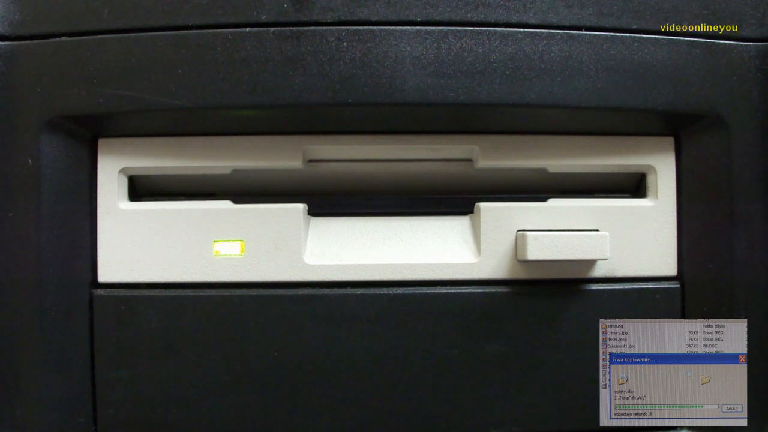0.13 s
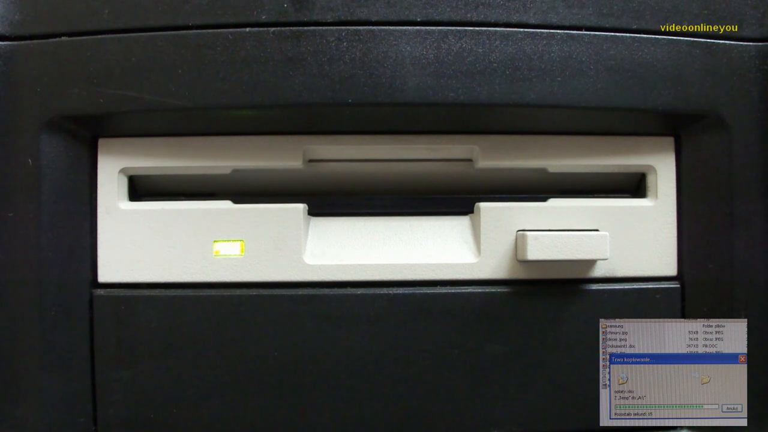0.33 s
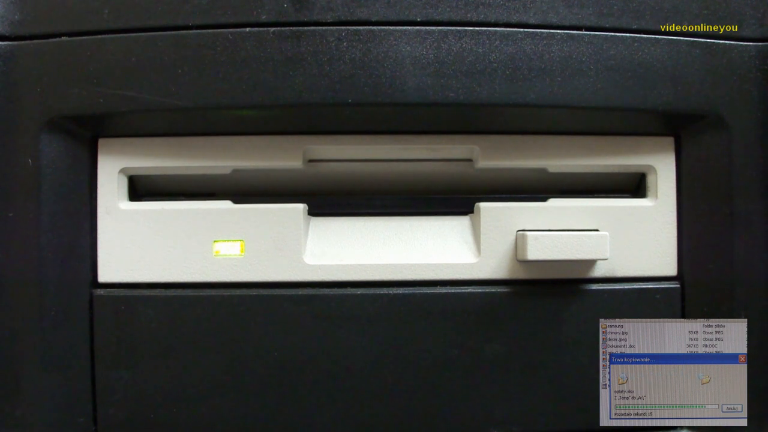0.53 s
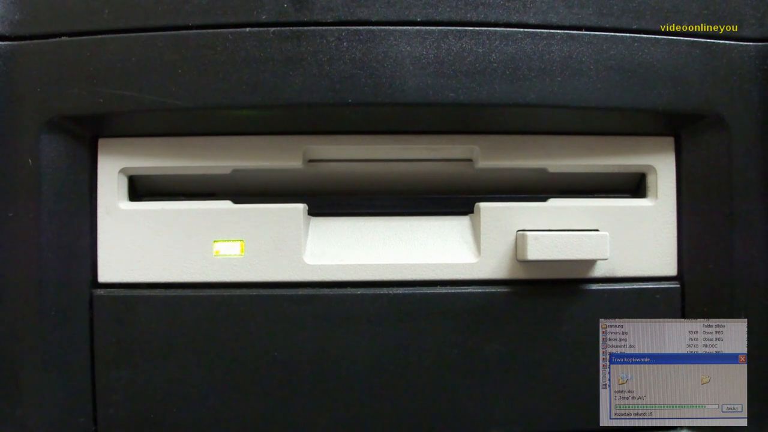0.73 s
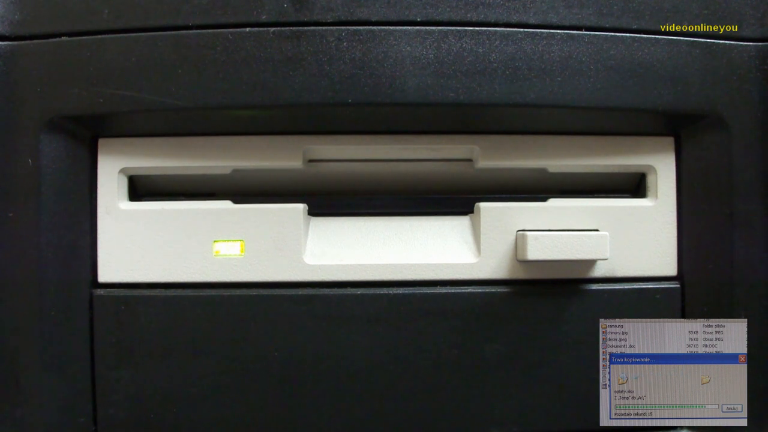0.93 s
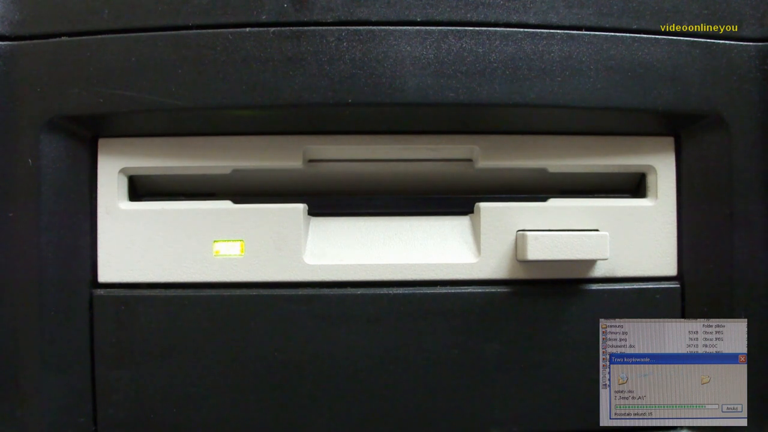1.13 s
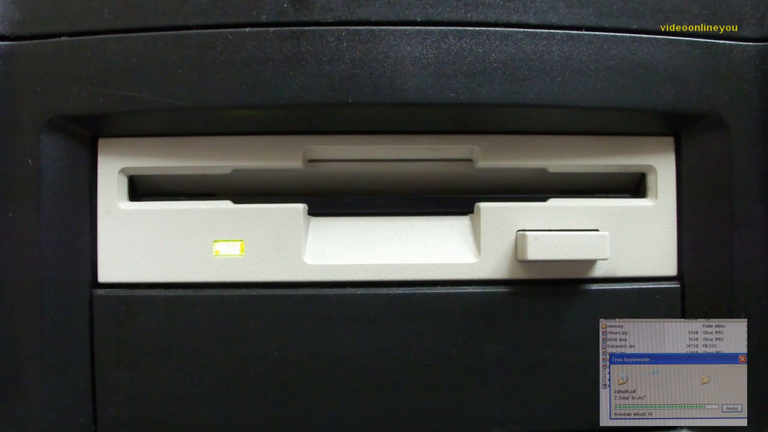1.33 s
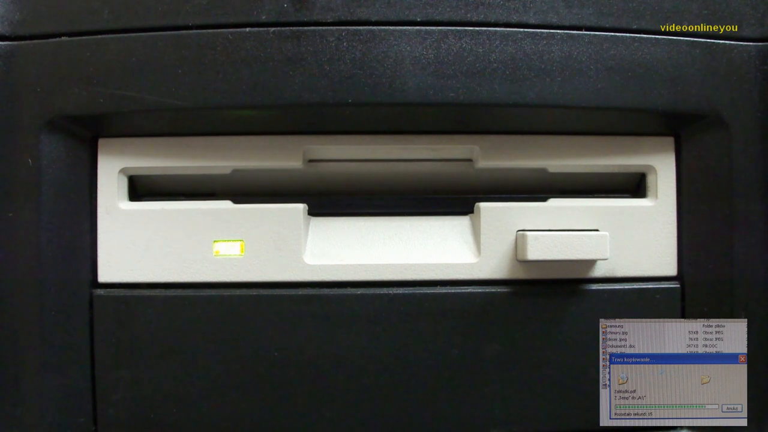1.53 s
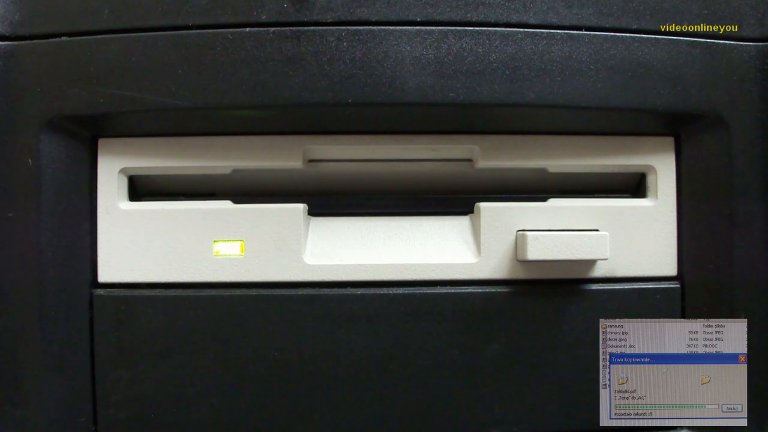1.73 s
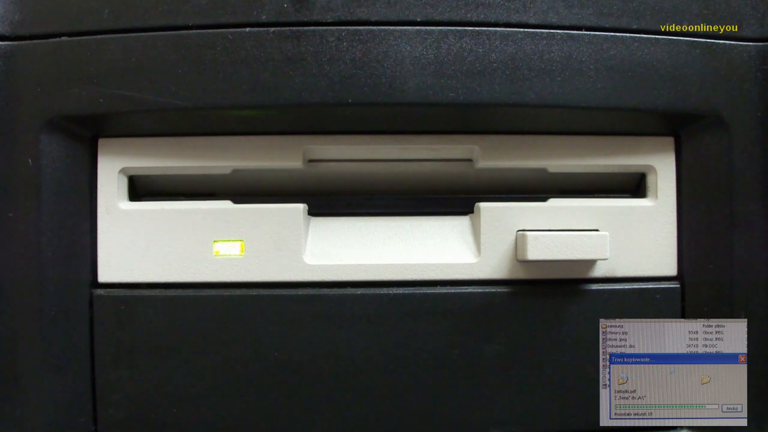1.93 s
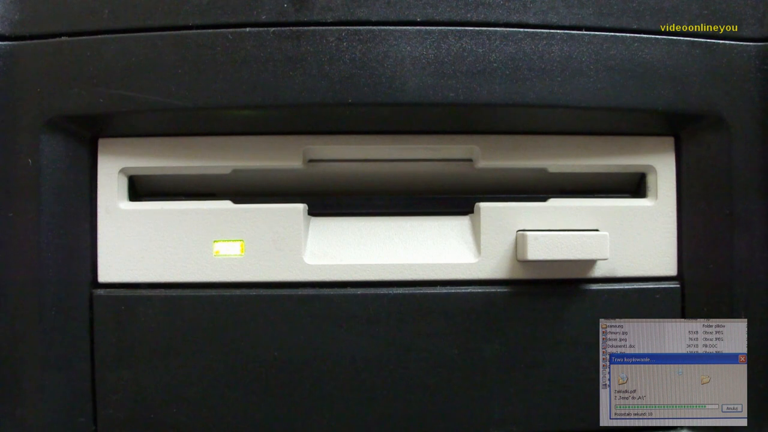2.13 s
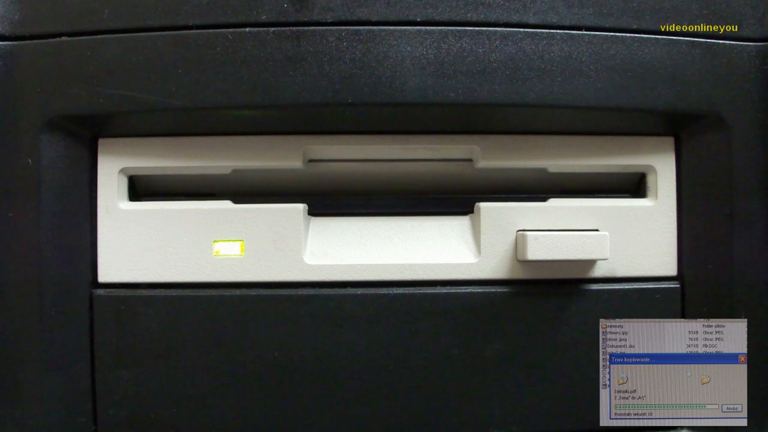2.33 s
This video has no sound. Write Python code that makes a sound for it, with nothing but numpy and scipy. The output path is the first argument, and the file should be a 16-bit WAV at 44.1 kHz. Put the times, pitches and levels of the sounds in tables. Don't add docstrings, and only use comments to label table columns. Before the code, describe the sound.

A floppy drive gives two short, steady-pitched mechanical buzzes, each starting and ending with a knock and rattle, while a computer case fan whirs constantly; close small camera microphone, drive sounding to the right.

```python
import sys
import numpy as np
from scipy import signal
from scipy.fft import rfft, irfft, next_fast_len
from scipy.io import wavfile
from scipy.ndimage import uniform_filter1d

SR = 44100
rng = np.random.default_rng(int(sys.argv[2]) if len(sys.argv) > 2 else 0)


def attenuation_scalar(level_db):
    decades = np.asarray(level_db, float) / 20
    return 10 ** decades


def master_out(mix):
    frames = np.transpose(np.atleast_2d(mix))
    ceiling = np.clip(frames, -1, 1)
    pcm = np.round(ceiling * 32767).astype(np.int16)
    wavfile.write(sys.argv[1], SR, pcm)


N = 105840


def evened(x):
    return x / np.sqrt(np.mean(x ** 2) + 1e-20)


def read(points, hz):
    f, value = np.transpose(points)
    return np.interp(np.log(hz + 1), np.log(f + 1), value)


def resonate(x, hz, width):
    r = np.exp(-np.pi * width / SR)
    return 2 * signal.lfilter([1 - r], [1, -r * np.exp(2j * np.pi * hz / SR)], x).real


def bandpass(x, order, low_hz, high_hz):
    return signal.sosfilt(signal.butter(order, [low_hz, high_hz], "bandpass", fs=SR, output="sos"), x)


def slow(seconds, count):
    size = max(int(seconds * SR), 1)
    drift = uniform_filter1d(uniform_filter1d(rng.standard_normal((count, N)), size), size)
    return drift / drift.std(axis=1, keepdims=True)


def shape(start, stop, rise, t60):
    t = np.arange(N) / SR
    return np.clip((t - start) / rise, 0, 1) * attenuation_scalar(-60 * np.maximum(t - stop, 0) / t60)


def panned(x, pan_db):
    return x * attenuation_scalar(np.array([[pan_db / 2], [-pan_db / 2]]))


def air(level_db, same, lead, patchy_db):
    a, b, c, d, patches = rng.standard_normal((N // 256 + 5, 513, 5)).T
    patches = evened(uniform_filter1d(uniform_filter1d(patches, 8, 0), 8, 1))
    same = np.clip(same, -1, 1)
    right = a + 1j * b
    left = same * np.exp(1j * lead) * right + np.sqrt(1 - same ** 2) * (c + 1j * d)
    spectra = np.array([left, right]) * attenuation_scalar(level_db[:, None] + patchy_db * patches)
    return evened(signal.istft(spectra, nperseg=1024, noverlap=768)[1][:, :N])


def air_rush(hz):
    # (frequency [Hz], level per Hz [dB])
    blades = [(18, -85), (30, -61), (109, -28.5), (154, -11), (286, -4.5), (445, -9), (606, -7.5),
              (1680, -5), (3000, -20.5), (3900, -72.5), (6600, -120)]
    # (frequency [Hz], width [Hz], gain [dB])
    case = [(604, 180, 8), (799, 120, 5), (1110, 120, 2), (1310, 83, 3.5), (1756, 35, 5.5), (389, 90, 3),
            (528.6, 32, 4.5)]
    # (frequency [Hz], likeness [0-1])
    likeness = [(60, 0.03), (100, 0.88), (180, 0.22), (300, 0.062), (520, 0.39), (890, 0.43), (1520, 0.64),
                (2600, 0.37)]
    # (frequency [Hz], phase [rad])
    left_lead = [(0, 0.11), (1120, 0.1), (1640, 0.85), (2150, 0), (2760, 1)]
    case_db = sum(db / (1 + (2 * (hz - f) / w) ** 2) for f, w, db in case)
    same, lead = read(likeness, hz)[:, None], read(left_lead, hz)[:, None]
    return attenuation_scalar(-48) * air(read(blades, hz) + case_db, same, lead, patchy_db=0.5)


def air_hiss(hz):
    # (frequency [Hz], level per Hz [dB])
    grille = [(2700, -36), (3200, -9.5), (4800, -11), (5500, -2), (7500, 0), (10100, -5), (11200, -12),
              (12100, -40)]
    # (frequency [Hz], level per Hz [dB])
    faint_top = [(13700, -43), (14100, -15), (15100, -22.5), (15650, 3), (15900, -17)]
    whistle_db = 10 * np.exp(-((hz - 10520) / 230) ** 2)
    edge_db = -60 * (hz > 11750)
    hiss = air(read(grille, hz) + edge_db + whistle_db, 0.13, 0, patchy_db=1.5)
    top = air(read(faint_top, hz), 0.1, 0, patchy_db=3)
    return attenuation_scalar(-65.5) * hiss + attenuation_scalar(-88) * top


def whines():
    # (frequency [Hz], rms level [dB], waver [Hz])
    tones = [(119.9, -71.5, .05), (612.5, -63, 4.82), (1168, -66.5, 3.5), (7800, -88, 3), (5520, -116, 3),
             (4791, -84.5, 3), (3380, -100, 2.2)]
    drift = slow(0.056, count=len(tones))
    out = np.zeros(N)
    for (hz, db, waver_hz), pitch, swell in zip(tones, drift, drift[::-1]):
        phase = 2 * np.pi * np.cumsum(hz + waver_hz * pitch) / SR
        out += np.sqrt(2) * attenuation_scalar(db + min(waver_hz, 4) * swell) * np.sin(phase)
    return out


def fan():
    hz = np.fft.rfftfreq(1024, 1 / SR)
    return panned(air_rush(hz) + whines(), -5.5) + panned(air_hiss(hz), -3.5)


def room(x):
    t = np.arange(SR // 2) / SR
    taps = rng.choice([-1., 1.], (2, len(t))) * (rng.random((2, len(t))) < .05)
    tail = taps * attenuation_scalar(-60 * t / 0.38) * (t > .003)
    return signal.fftconvolve(x[None], tail / np.linalg.norm(tail[0]), axes=1)[:, :N]


def chassis(x):
    # (frequency [Hz], width [Hz], level [dB])
    modes = [(569.5, 130, -6), (798.4, 93, 1.5), (946, 150, -9), (1098, 84, 1), (1470, 58, -6),
             (1700, 39, 1), (1830, 50, -4), (2080, 91, -3), (2285, 410, -12.5)]
    rung = sum((-1) ** k * attenuation_scalar(db) * resonate(x, f, w) for k, (f, w, db) in enumerate(modes))
    skin = attenuation_scalar(-18.5) * resonate(x, 1500, 1330)
    return bandpass(rung + skin, 5, 250, 2700)


def bright(x):
    tick = resonate(resonate(x, 6700, 6200), 6700, 6200)
    rail = attenuation_scalar(9.5) * resonate(x, 6380, 420)
    return evened(bandpass(tick + rail, 10, 3000, 10200))


def squeal():
    middle_s, length_s, hz, width_hz = 0.527, 0.097, 1865, 34
    t = np.arange(N) / SR
    sing = evened(resonate(resonate(rng.standard_normal(N), hz, width_hz), hz, width_hz))
    return attenuation_scalar(-47) * np.exp(-((t - middle_s) / length_s) ** 2) * sing


def knocks():
    # (time [s], peak level [dB], upper mode [Hz], upper mode level [dB])
    blows = [
        (.236, -35.5, 1700, -13),
        (.643, -37.5, 1480, -3),
        (.903, -42, 1470, 2),
        (1.315, -40, 1676, -6),
    ]
    # (frequency [Hz], level [dB], ring-out T60 [s])
    low_modes = [(818.5, -2.5, 0.084), (945, -7.5, 0.04)]
    t = np.arange(N) / SR
    out = np.zeros(N)
    for s, peak_db, upper_hz, upper_db in blows:
        for hz, db, t60 in list(low_modes) + [(upper_hz, upper_db, 0.029)]:
            ring = shape(s, s + 0.012, 0.005, t60)
            out += attenuation_scalar(peak_db + db) * ring * np.sin(2 * np.pi * hz * (t - s))
    return out


def clatter():
    # (start [s], length [s])
    times = [
        (.223, .02),
        (.637, .016),
        (.895, .014),
        (1.31, .02),
        (1.02, .01),
        (1.08, .012),
        (1.158, .012),
        (1.338, .012),
    ]
    # (frame level [dB], tick level [dB])
    levels = [(-42, -61), (-42.5, -61.5), (-41, -62.5), (-44, -59.5), (-58, -63.5), (-48, -63), (-60, -64),
              (-46, -68)]
    rattle_per_s, spread_db, t60 = 2500, 2, 0.07
    size = attenuation_scalar(spread_db * np.minimum(rng.exponential(1, N), 3))
    hits = (rng.random(N) < rattle_per_s / SR) * size * rng.choice([-1., 1.], N)
    body, tick = np.zeros(N), np.zeros(N)
    for (s, length), (frame_db, tick_db) in zip(times, levels):
        body += attenuation_scalar(frame_db) * shape(s, s + length, 0.0014, t60)
        tick += attenuation_scalar(tick_db) * shape(s, s + length / 2, 0.0062, t60)
    return chassis(hits * body) / np.std(chassis(hits)) + tick * bright(rng.standard_normal(N))


def stepper():
    # (start [s], stop [s])
    times = [
        (.236, .644),
        (.899, 1.313),
    ]
    # (level [dB], rise [s], ring-out T60 [s])
    seeks = [(-35.5, 0.029, 0.16), (-40.5, 0.012, 0.12)]
    # (multiple of step rate, level [dB])
    out_from = [(1, -31), (2, -39), (3, -13.5), (4, 0.5), (5, -50), (6, -35), (7, -25), (8, -23),
                (9, -26.5), (10, -31), (11, -32), (12, -32), (13, -55.5), (14, -42), (15, -54.5), (16, -50)]
    out_to = [(1, -29.5), (2, -47), (3, -11.5), (4, 2), (5, -23.5), (6, -21.5), (7, -17), (8, -21.5),
              (9, -27), (10, -17.5), (11, -14.5), (12, -16), (13, -46), (14, -29.5), (15, -33), (16, -45)]
    back_from = [(1, -21), (2, -22), (3, -14), (4, 3), (5, -13.5), (6, -30), (7, -13), (8, -13.5), (9, -22),
                 (10, -13.5), (11, -15), (12, -23), (13, -23.5), (14, -31.5), (15, -49), (16, -50)]
    back_to = [(1, -21.5), (2, -67), (3, -11), (4, 0.5), (5, -10.5), (6, -42), (7, -15.5), (8, -16.5),
               (9, -19), (10, -17), (11, -21), (12, -26), (13, -26), (14, -27), (15, -28), (16, -46)]
    step_hz, wobble_s, gate_depth = 162.85, 0.025, 0.38
    t, out = np.arange(N) / SR, np.zeros(N)
    gate = 1 - gate_depth + gate_depth * 3 * np.exp(-(step_hz * t % 1) / 0.37)
    noise = gate * rng.standard_normal(N)
    friction = attenuation_scalar(-53.5) * evened(chassis(noise)) + attenuation_scalar(-72) * bright(noise)
    balances = [(out_from, out_to), (back_from, back_to)]
    for (start, stop), (db, rise, t60), (leaving, arriving) in zip(times, seeks, balances):
        travel = np.sin(np.pi / 2 * np.clip((t - start) / (stop - start), 0, 1)) ** 2
        re, im = slow(wobble_s, count=len(leaving)), slow(wobble_s, count=len(leaving))
        for (k, from_db), (_, to_db), p, q in zip(leaving, arriving, re, im):
            wobble = 1 + (0.04 + 0.03 * abs(k - 4)) * (p + 1j * q)
            wave = (wobble * np.exp(1j * (2 * np.pi * k * step_hz * t + k * k))).real
            level = attenuation_scalar(db + from_db + (to_db - from_db) * travel)
            slower = 1 + 1.7 * (k < 3.5)
            out += np.sqrt(2) * level * wave * shape(start, stop, rise * slower, t60)
        out += friction * shape(start, stop, rise, 0.022)
    return out


def scene():
    drive = stepper() + clatter() + knocks() + squeal()
    return panned(drive + attenuation_scalar(-13) * room(drive), -7.5) + fan()


def roll_off(x):
    return signal.sosfilt(signal.butter(12, 15830, fs=SR, output="sos"), x)


def record(dry):
    # (frequency [Hz], width [Hz], depth [dB])
    notches = [(2993, 87, -46), (3956, 70, -49), (4940, 88, -40)]
    size = next_fast_len(N + 8192)
    hz = np.fft.rfftfreq(size, 1 / SR)
    notch_db = sum(db * np.exp(-abs(hz - f) / w) for f, w, db in notches)
    mix = irfft(rfft(dry, size) * attenuation_scalar(notch_db), size)[:, :N]
    return roll_off(mix)


dry = scene()
out = record(dry)
master_out(out)
```